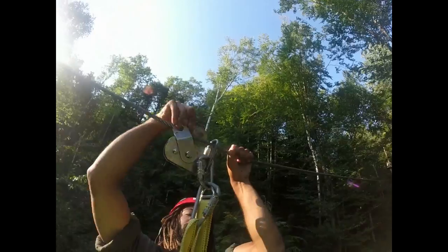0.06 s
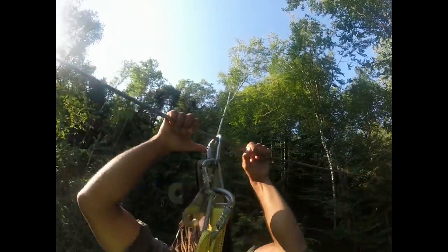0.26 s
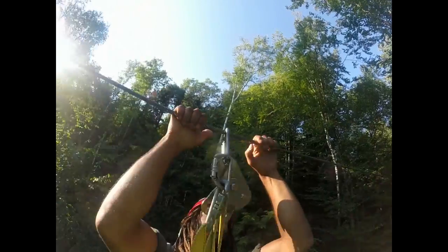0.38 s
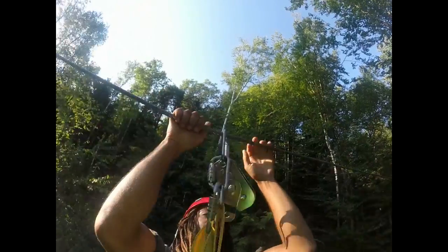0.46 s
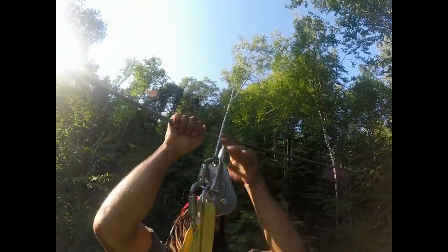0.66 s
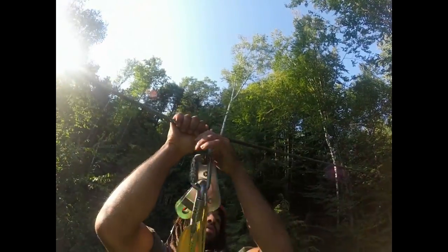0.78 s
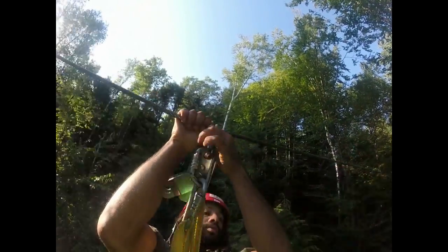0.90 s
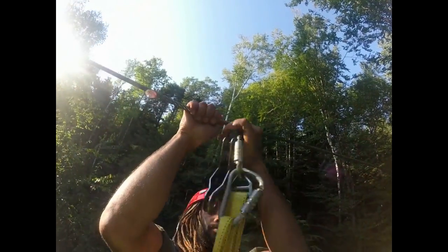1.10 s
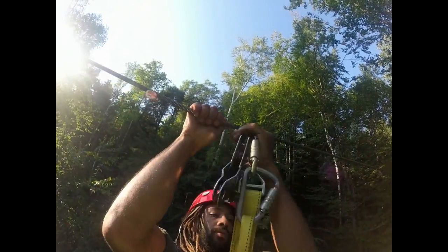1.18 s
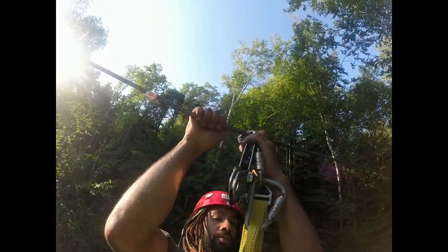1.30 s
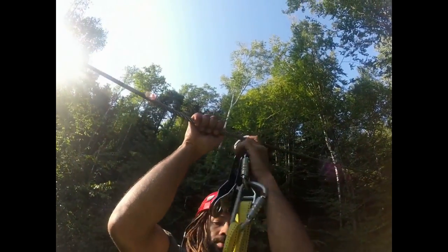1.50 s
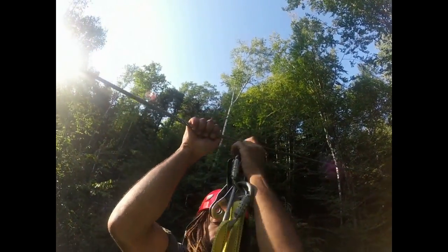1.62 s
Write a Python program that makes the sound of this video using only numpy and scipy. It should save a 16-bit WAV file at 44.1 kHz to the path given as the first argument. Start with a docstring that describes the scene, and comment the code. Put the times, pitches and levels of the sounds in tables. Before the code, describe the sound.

Steel carabiners and a pulley trolley clink together, close and dry, outdoors. Light ticks from 0.06 seconds thicken into a jangling flurry at 0.2-0.45, peaking in a hard, bright clack near 0.35 with a brief ring. A crisp double clink follows at 0.68, then sparse faint taps, another sharp clack at 1.18, and small rattling clicks until about 1.57. Faint low breeze and soft leaf hush lie beneath.

```python
"""Hand-held steel hardware under impact

Steel carabiners and a pulley trolley knock together in the hands, outdoors among trees, close to a microphone.
Each knock is a dying burst of random micro-contacts exciting damped sine modes and a crack of coloured noise.
A loose carabiner rings free three times as decaying sines; faint random ticks rattle through the same modes.
Behind lie two shaped noises: a lumpy breeze on the microphone and the steady hush of leaves."""
import sys
import numpy as np
from scipy import signal
from scipy.fft import rfft, irfft, next_fast_len
from scipy.io import wavfile
from scipy.ndimage import uniform_filter1d, map_coordinates

SR = 44100
rng = np.random.default_rng(int(sys.argv[2]) if len(sys.argv) > 2 else 0)


def unload_audio(sound):
    """Save the sound as a 16-bit wav file, at the path given as the first command line argument."""
    columns = np.transpose(np.atleast_2d(sound))
    # keep every value between -1 and 1, then stretch to whole-number steps
    steps = np.round(np.clip(columns, -1, 1) * 32767)
    wavfile.write(sys.argv[1], SR, steps.astype(np.int16))


N = 72765

# Impacts: start_s, level_db (relative), chatter_t60_s, trolley_over_carabiners_db, tilt_db_per_octave
KNOCKS = [(0.0587, -36.5, 0.017, -9, -11), (0.0637, -30.5, 0.017, 4, -6),
          (0.0813, -29, 0.018, -17.5, -14.5), (0.0956, -31.5, 0.018, -1, -3), (0.0995, -34, 0.031, 1, -6),
          (0.1077, -33.5, 0.024, -5, -5), (0.1565, -30, 0.024, -6, -2.5), (0.1753, -36, 0.041, -4, -5),
          (0.1862, -34.5, 0.031, 7.5, -4), (0.19, -28, 0.025, -9, -14.5), (0.1971, -31, 0.028, 11, -5),
          (0.2047, -20, 0.019, -4, -4), (0.2127, -20.5, 0.054, -1.5, -4.5), (0.2154, -18, 0.0067, 34, -8.5),
          (0.2235, -25.5, 0.079, -6, -9), (0.2421, -24, 0.028, -1, -4), (0.252, -30, 0.034, 25, -5),
          (0.2841, -20, 0.067, -30, -14.5), (0.2892, -23, 0.045, 35, 0.5),
          (0.3001, -26.5, 0.14, -17.5, -13), (0.3151, -33, 0.027, 25, -5), (0.3241, -23, 0.075, -7.5, -8.5),
          (0.3389, -17.5, 0.043, -5, -6), (0.3534, -2.5, 0.018, -2.5, -2.5),
          (0.3628, -14.5, 0.044, -17.5, -10.5), (0.3767, -26.5, 0.07, -3, 4), (0.387, -25.5, 0.082, -3, -3),
          (0.4038, -9, 0.023, -5.5, -1.5), (0.4201, -25.5, 0.027, -9, -5.5),
          (0.4303, -20.5, 0.022, 7.5, 4.5), (0.4396, -24.5, 0.051, -14, -7.5),
          (0.4914, -37.5, 0.11, -9.5, -12.5), (0.5686, -37, 0.011, -2, -4.5), (0.649, -40, 0.011, 23, -2),
          (0.6759, -15.5, 0.057, -5.5, -7), (0.6799, -10.5, 0.029, -5, -1.5), (0.6842, -20.5, 0.021, 4, -3),
          (0.689, -24.5, 0.016, -9, 3), (0.6934, -40.5, 0.11, 8, 2), (0.7277, -36, 0.037, -19, -14),
          (0.74, -38.5, 0.033, 0, -7), (0.8346, -36.5, 0.043, -5, -10), (0.857, -39.5, 0.088, -8, -14),
          (0.8936, -27.5, 0.022, 1.5, -5.5), (0.9278, -41.5, 0.011, -5, -5), (0.9642, -30, 0.021, 4, -5.5),
          (0.9751, -32.5, 0.014, -15, -19), (1.044, -24.5, 0.021, -7, -4), (1.0549, -32.5, 0.01, -10, -11),
          (1.0708, -36.5, 0.1, -26, -21), (1.1374, -33, 0.0074, 0, -7.5), (1.182, -8, 0.03, -4.5, -0.5),
          (1.186, -16, 0.02, -2, 3), (1.1944, -22, 0.022, -11, -6), (1.2002, -25, 0.03, 1, 1),
          (1.2117, -35.5, 0.038, 7, 4), (1.263, -36, 0.024, -2, -4.5), (1.2938, -35, 0.017, 0, -3.5),
          (1.3034, -32.5, 0.031, 0, -2), (1.3193, -26.5, 0.024, -6, -2), (1.347, -26.5, 0.018, -7.5, -2),
          (1.3556, -36.5, 0.022, -14, 2), (1.3969, -25, 0.032, -1.5, -3.5), (1.4166, -31, 0.015, -13, -9.5),
          (1.4364, -34.5, 0.02, -22, -8), (1.4646, -25, 0.025, 1, 2), (1.5218, -31.5, 0.034, -3, 0),
          (1.5468, -33.5, 0.033, -25, -14.5), (1.5663, -42, 0.025, -3, -2)]
# Modes of the trolley: pitch_hz, early_db, middle_db, late_db
TROLLEY_MODES = [(830, -18.5, -26, -15), (1091, -15, -17, -9.5), (1508, -10.5, -10.5, -5.5),
                 (2066, -3, -13, -3), (2556, -4, -1, -2), (2840, -14.5, -3.5, -5), (2999, 1.5, -1.5, -22.5),
                 (3195, -6, -5.5, 1), (3510, -1, 2.5, -1.5)]
# Modes of the carabiners: pitch_hz, early_db, middle_db, late_db
CARABINER_MODES = [(4060, -8, -2, -34.5), (4160, 2, -8.5, 1.5), (4380, -6, -5, 3.5), (4500, -2.5, 3.5, 3),
                   (4710, -2.5, -27, -9), (5590, -3.5, 4, -1), (5966, -3.5, 2.5, 7), (6048, 3.5, 6, 7),
                   (6400, -6, -14, -7), (6904, -2.5, 2.5, -0.5), (7530, -4, 1, -8), (7620, -2.5, 2, 0.5),
                   (7960, 0, 3, -5.5), (9140, -1, -3, 0.5)]
# Spectrum of the contact noise: frequency_hz, level_db (relative, per Hz)
CRACK_SPECTRUM = [(500, -56), (800, -49), (1800, -41), (2300, -26), (3100, 9), (3800, -29), (4350, -34),
                  (5050, -30), (5950, -3), (8000, -13), (8450, -20), (9200, -12), (11300, -9.5),
                  (13000, -8.5), (16000, -17)]
# Free ringing: start_s, level_db, upper_modes_db, time_until_damped_s
FREE_RINGS = [(0.352, -29, -15, 0.014), (1.347, -55.5, 0, 0.045), (1.52, -44.5, -32.5, 0.024)]
# Modes of the loose carabiner: pitch_hz, level_db, t60_s
LOOSE_MODES = [(7507, 0, .25), (9440, 0, .09), (12750, -12, .07)]
# Course of the rattling: time_s, level_db
RATTLE_LEVELS = [(0.0, -68), (0.136, -72), (0.26, -54), (0.67, -71), (1.368, -61.5), (1.506, -70),
                 (1.65, -68.5)]
# Spectrum of the leaves: frequency_hz, level_db (relative, per Hz)
HUSH_SPECTRUM = [(59, -10.5), (100, -3.5), (818, -17), (1100, -19.5), (1550, -19.5), (2220, -22),
                 (5650, -32.5), (13800, -47), (16000, -70)]
# Spectrum of the breeze: frequency_hz, level_db (relative, per Hz)
BREEZE_SPECTRUM = [(8.8, -1), (15, 12), (47, 8.5), (76, 0), (130, -32.5), (170, -26), (290, -120)]
# Times at which the knocks change colour: time_s
COLOUR_CHANGES_S = [.6, 1.1]

# Contacts: rise of the chatter, its lead on the listed start, mean excess of a contact
ATTACK_S, LEAD_S, SPIKY_DB = 0.00088, 0.0005, 2.5
FIRM_TAP = 4.33  # size of one firm early contact against the chatter
LEVEL_OFFSET_DB = -10.0  # from a listed knock level to its loudest 3 ms RMS

# Modes: decay times well below DAMP_HZ, above which they shorten quickly; rise after a tap
TROLLEY_T60_S, CARABINER_T60_S, DAMP_HZ, SWELL_S = 0.023, 0.013, 6500, 0.00036
MODE_SCATTER_DB, DETUNE = 1.8, 0.006  # standard deviations per response; detuning is a share of pitch
EVENNESS = 0.9  # how evenly the contacts feed the modes, 0-1
TILT_PIVOT_HZ = 4000  # the tilt leaves this frequency unchanged
CRACK_DB, CRACK_T60_S = -4, 0.0098  # initial level against the modes; decay

TICKS_PER_S, TICK_SPREAD_DB = 1500, 2  # mean rate in each of three colours; mean excess of a tick
HUSH_DB, BREEZE_DB, GUST_DB, GUSTS_PER_S = -56, -50.5, 2.5, 8.46  # gusts: depth, rate of random points
THIN_HZ = 2053  # small parts radiate little below this
ROLL_HZ, TOP_HZ = 14900, 16600  # the microphone fades above the first; nothing passes from the second


def amp(db):
    """Level and amplitude are related logarithmically: 20 dB is a factor of ten."""
    return 10 ** (np.asarray(db) / 20)


def unit(x):
    """Division by the root mean square normalises a signal to unit power."""
    return x / np.sqrt(np.mean(x ** 2) + 1e-20)


def coloured(x, points):
    """Spectral shaping: levels in dB, interpolated over log frequency, weight the spectrum of x."""
    f, db = np.transpose(points)
    m = next_fast_len(len(x) + 8192)
    hz = np.fft.rfftfreq(m, 1 / SR)
    gain = amp(np.interp(np.log(hz + 1), np.log(f + 1), db))
    return irfft(rfft(x, m) * gain, m)[:len(x)]


def fade(t, t60):
    """Exponential decay: the level falls 60 dB in t60 seconds."""
    return amp(-60 * t / max(t60, 0.001))


def tilt(hz, tilt_db):
    """Spectral tilt: the level changes by a fixed number of dB per octave."""
    return tilt_db * np.log2(hz / TILT_PIVOT_HZ)


def knocks():
    """Chattering impact: a burst of random micro-contacts excites the metal and dies away."""
    out, t = np.zeros(N + SR), np.arange(SR // 10) / SR
    for start, level_db, chatter_t60, trolley_db, tilt_db in KNOCKS:
        contacts = rng.standard_normal(len(t)) * amp(SPIKY_DB * rng.exponential(size=len(t)))
        taps = contacts * fade(t, chatter_t60) * (1 - np.exp(-t / ATTACK_S))
        taps[round(ATTACK_S * SR)] = FIRM_TAP
        colour = np.searchsorted(COLOUR_CHANGES_S, start)
        sound = metal_response(taps, colour, trolley_db, tilt_db)
        loudest = np.sqrt(np.abs(uniform_filter1d(sound ** 2, size=132)).max())  # 3 ms RMS
        first = round((start - LEAD_S) * SR)
        out[first:][:len(sound)] += amp(level_db + LEVEL_OFFSET_DB) * sound / loudest
    return out[:N]


def metal_response(taps, colour, trolley_db, tilt_db):
    """Linear superposition: the response to many taps is their convolution with that to one."""
    t = np.arange(SR // 10) / SR
    modes = damped_modes(t, colour, trolley_db, tilt_db)
    # Offset the unequal energy that the taps supply to the modes
    mode_power = np.abs(rfft(modes)) ** 2
    tap_power = np.abs(rfft(taps[:len(t)])) ** 2 + 1e-20
    energy_share = mode_power @ tap_power / mode_power.sum(axis=1) / tap_power.mean()
    ringing = energy_share ** (-EVENNESS / 2) @ modes
    ringing /= np.sqrt(np.mean(ringing[:SR // 500] ** 2))  # unit RMS over the first 2 ms
    return signal.fftconvolve(taps, ringing + amp(CRACK_DB) * crack(t, tilt_db))


def damped_modes(t, colour, trolley_db, tilt_db):
    """Modal superposition: a struck body answers as damped sines, here one row per mode."""
    modes = [(hz, db[colour] + trolley_db / 2, TROLLEY_T60_S) for hz, *db in TROLLEY_MODES]
    modes += [(hz, db[colour] - trolley_db / 2, CARABINER_T60_S) for hz, *db in CARABINER_MODES]
    chance = rng.standard_normal((3, len(modes)))
    rows = []
    for (hz, db, low_t60), scatter, detune, phase in zip(modes, *chance):  # phase in cycles
        level = amp(db + tilt(hz, tilt_db) + MODE_SCATTER_DB * scatter)
        decay = fade(t, low_t60 / (1 + (hz / DAMP_HZ) ** 2))
        rows.append(level * decay * np.sin(2 * np.pi * (hz * (1 + DETUNE * detune) * t + phase)))
    return (1 - np.exp(-t / SWELL_S)) * np.array(rows)


def crack(t, tilt_db):
    """Broadband contact noise: shaped random pressure decays exponentially after a tap."""
    spectrum = [(hz, db + tilt(hz, tilt_db)) for hz, db in CRACK_SPECTRUM]
    return unit(coloured(rng.standard_normal(len(t)), spectrum)) * fade(t, CRACK_T60_S)


def free_ring():
    """Damping by contact: a loose carabiner rings slowly away until added loss hastens its decay."""
    out, t = np.zeros(N + SR), np.arange(SR // 5) / SR
    for start, level_db, upper_db, damped_at in FREE_RINGS:
        tone = np.zeros(len(t))
        for k, (hz, mode_db, t60) in enumerate(LOOSE_MODES):
            level = amp(mode_db + upper_db * (k > 0))
            tone += level * fade(t, t60) * np.sin(2 * np.pi * hz * t)
        damping = fade(np.maximum(t - damped_at, 0), 0.041)
        rise = 1 - np.exp(-t / 0.0019)
        out[round(start * SR):][:len(t)] += amp(level_db) * tone * damping * rise
    return out[:N]


def rattle():
    """Random excitation: tiny independent ticks drive the modes in all three knock colours together."""
    total = np.zeros(N)
    for colour in range(3):
        struck = rng.random(N) < TICKS_PER_S / SR
        sizes = rng.standard_normal(N) * amp(TICK_SPREAD_DB * rng.exponential(size=N))
        total += metal_response(struck * sizes, colour, 0, 0)[:N]
    time_s, level_db = np.transpose(RATTLE_LEVELS)
    return unit(total) * amp(np.interp(np.arange(N) / SR, time_s, level_db))


def breeze():
    """Wind noise: low-frequency random pressure on the microphone, modulated by slow random gusts."""
    points = rng.standard_normal(int(N * GUSTS_PER_S / SR) + 4)
    gust = map_coordinates(points, [np.arange(N) * GUSTS_PER_S / SR])
    noise = coloured(rng.standard_normal(N), BREEZE_SPECTRUM)
    return amp(BREEZE_DB) * unit(amp(GUST_DB * gust) * noise)


def leaf_hush():
    """Stationary noise: the hush of leaves is a steady random sound with a falling spectrum."""
    return amp(HUSH_DB) * unit(coloured(rng.standard_normal(N), HUSH_SPECTRUM))


def scene():
    """Superposition of sources: the metal, weak in low-frequency radiation, adds to the air noise."""
    radiation = signal.butter(2, THIN_HZ, "high", fs=SR, output="sos")
    metal = signal.sosfilt(radiation, knocks() + free_ring() + rattle())
    return (metal + breeze() + leaf_hush())[None]


def record(dry):
    """Band limitation: the microphone's response fades at the top, then ends at a sharp cutoff."""
    m = next_fast_len(N + 8192)
    hz = np.fft.rfftfreq(m, 1 / SR)
    response = (hz < TOP_HZ) / (1 + (hz / ROLL_HZ) ** 30)
    return irfft(rfft(dry, m) * response, m)[:, :N]


dry = scene()
out = record(dry)
unload_audio(out)
```